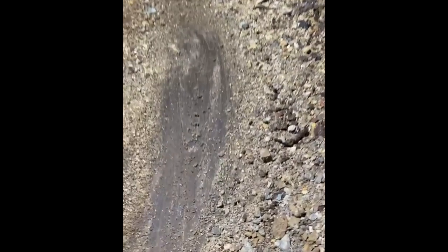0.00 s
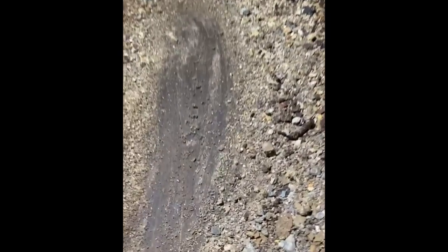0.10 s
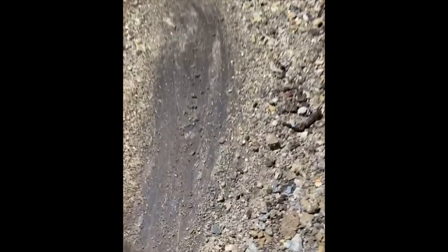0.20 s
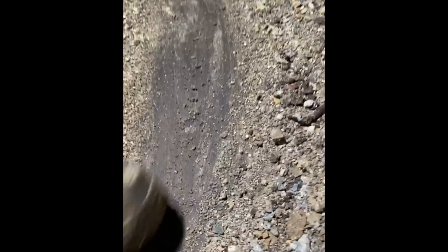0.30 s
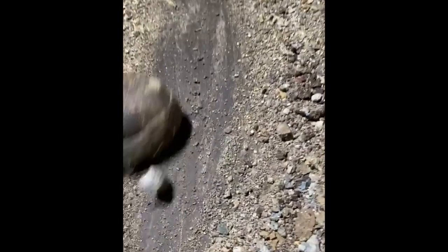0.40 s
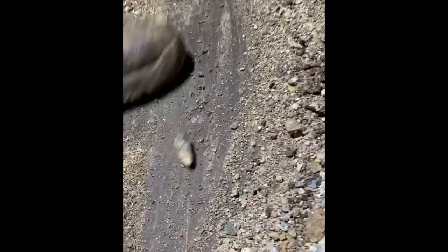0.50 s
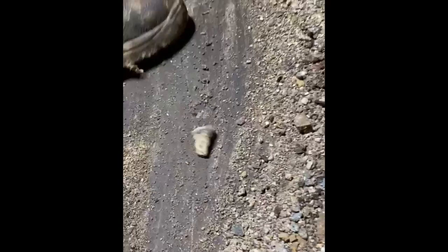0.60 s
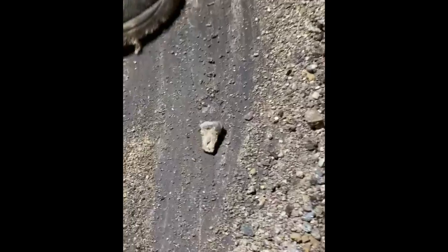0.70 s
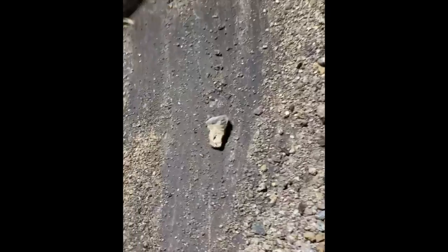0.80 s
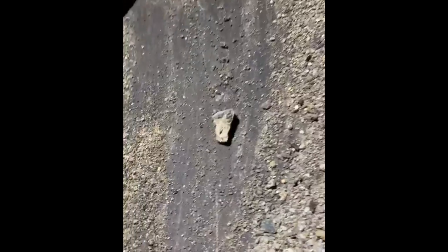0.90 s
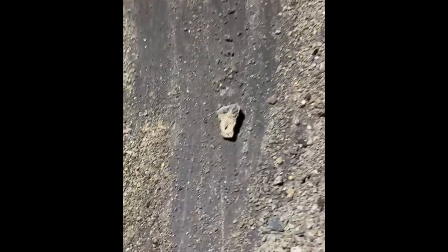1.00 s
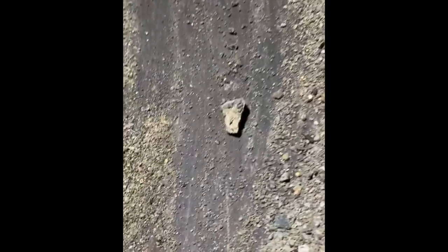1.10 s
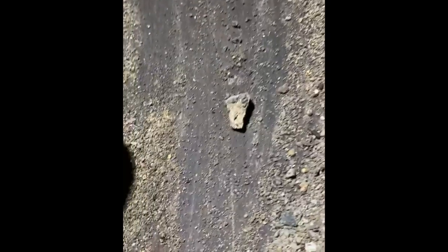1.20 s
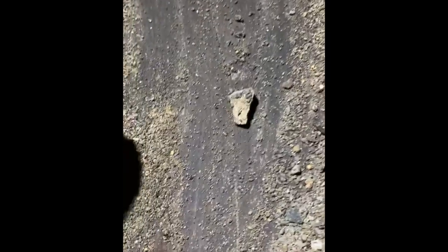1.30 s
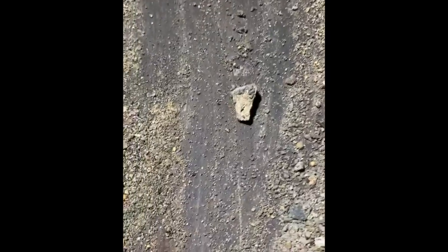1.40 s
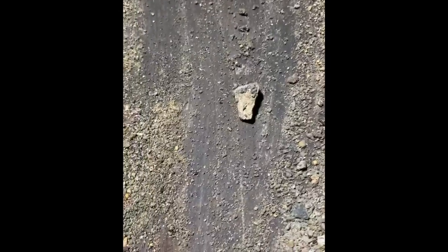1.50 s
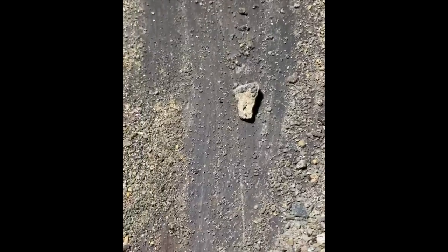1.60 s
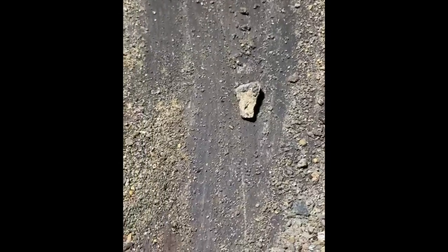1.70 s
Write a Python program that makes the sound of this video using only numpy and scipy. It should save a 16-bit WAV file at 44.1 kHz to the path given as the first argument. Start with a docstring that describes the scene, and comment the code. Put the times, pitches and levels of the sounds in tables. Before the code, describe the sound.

A work boot drags briefly over crackling grit, strikes gravel with a loud crunch and low thud, sprays sand and pebbles that settle, then grinds softly; close stereo microphone, short dry room tail.

```python
"""Boot kicking along gritty gravel

A work boot drags in over crackling grit, strikes with a crunch and a low thud, and sends sand and pebbles moving.
The grit settles; then the sole grinds softly once more, leaning further left.
Friction is filtered random grains, impacts are decaying modes, and fractures are short bursts of clicks.
Two close microphone ports hear it with a short room tail and quiet air."""
import sys
import numpy as np
from scipy import signal
from scipy.fft import rfft, irfft
from scipy.io import wavfile
from scipy.ndimage import uniform_filter1d

SR = 44100
rng = np.random.default_rng(int(sys.argv[2]) if len(sys.argv) > 2 else 0)


def persist_wave(psi):
    """Save psi, clipped to +-1, as 16-bit WAV."""
    counts = np.round(np.clip(psi, -1, 1) * 32767).astype(np.int16)
    wavfile.write(sys.argv[1], SR, np.atleast_2d(counts).T)


N = 79380
T = np.arange(N) / SR  # time in s
# In every colour table, level_db is a relative spectral density.


def amp(db):
    """Level to amplitude: 20 dB is a factor of ten."""
    return 10 ** (np.asarray(db) / 20)


def evened(x):
    """Power normalisation: scales to rms 1."""
    return x / np.sqrt(np.mean(x ** 2) + 1e-20)


def steadied(x, size):
    """Envelope flattening: divides by the running rms over size samples."""
    return x / np.sqrt(abs(uniform_filter1d(x ** 2, size)) + 1e-9)


def read(points, hz):
    """Interpolation of a curve on a logarithmic frequency axis."""
    f, value = np.transpose(points)
    return np.interp(np.log(hz + 1), np.log(f + 1), value)


def add(mix, s, sound):
    """Superposition: adds a sound into the mix from s seconds on."""
    part = mix[max(round(s * SR), 0):][:len(sound)]
    part += sound[:len(part)]


def colour(x, tone, size=4096):
    """Minimum-phase filtering: the log gain fixes the phase; the response has unit energy."""
    log_gain = np.log(amp(read(tone, abs(np.fft.fftfreq(size, 1 / SR)))))
    spectrum = np.exp(np.conj(signal.hilbert(log_gain)))
    taps = np.fft.ifft(spectrum).real[:size // 2]
    return signal.fftconvolve(x, taps / np.linalg.norm(taps))[:len(x)]


def high_pass(x, hz):
    """Second-order high-pass filtering: attenuates what lies below hz."""
    return signal.sosfilt(signal.butter(2, hz, "high", fs=SR, output="sos"), x)


def ring(hz, t60, rise, size=12000):
    """Damped oscillation: one mode falls 60 dB in t60 seconds after a soft start."""
    t = T[:size]
    decay = np.exp(-np.log(1000) * t / t60)
    return np.sin(2 * np.pi * hz * t) * decay * (1 - np.exp(-t / rise))


def burst(length, tone, rise, size=4096):
    """Brittle fracture: random clicks swell and die; their energy is that of rms 1 over length."""
    t = np.arange(size) / SR
    fractures = rng.standard_normal(size) * (rng.random(size) < .4)
    attack = np.minimum(t / (rise * length + 1e-9), 1) ** 2  # rise is a share of the length
    x = colour(fractures * np.exp(-(t / length) ** 2) * attack, tone)
    return x * np.sqrt(length * SR / (np.sum(x ** 2) + 1e-20))


def grains(per_s, spread_db):
    """Random impulse train: signs are random, levels exponentially scattered in dB."""
    sizes = amp(spread_db * np.minimum(rng.exponential(1, N), 4))
    signs = rng.choice([-1., 1.], N)
    return evened(sizes * signs * (rng.random(N) < per_s / SR))


def scrape(curve, tone, per_s, spread_db, clump_db, body_db, treble_db):
    """Granular friction: clumped grains in two bands, each following its own level curve."""
    split_hz, fade_s = 2570, 0.036
    s, body, treble = np.transpose(curve)
    clumps = amp(clump_db * evened(uniform_filter1d(rng.standard_normal(N), size=200)))
    grit = colour(grains(per_s, spread_db) * clumps, tone)

    def band(kind):
        """Band splitting: one side of the split, held at a steady level."""
        return steadied(signal.sosfilt(signal.butter(3, split_hz, kind, fs=SR, output="sos"), grit), size=2000)

    low = band("low") * amp(body_db + np.interp(T, s, body))
    high = band("high") * amp(treble_db + np.interp(T, s, treble))
    # full between the ends of the curve, fading outside them
    gate = np.clip(np.minimum(T - s[0], s[-1] - T) / fade_s + 1, 0, 1)
    return gate * (low + high)


def thuds():
    """Damped low modes: heel and stones thud dully."""
    # thuds: start_s, level_db, pitch_hz, t60_s
    thud_list = [(.18, -18.5, 233, 0.046), (0.196, -14.5, 81, 0.14), (0.228, -19, 188.4, 0.063),
                 (0.315, 4.5, 103, 0.021), (0.3299, 0, 76.3, 0.12), (.355, -16.5, 288, 0.039),
                 (0.5, -13, 189, 0.026), (0.527, -15.5, 75.5, .13), (0.663, -30.5, 144.5, 0.22),
                 (.74, -18, 140, .06), (0.751, -19, 240, 0.021), (.773, -23, 195, 0.036),
                 (0.848, -33, 265, 0.031), (1.062, -55, 328, 0.017), (1.073, -45, 220, 0.046),
                 (1.237, -51, 62.2, .15), (1.385, -50.5, 106.6, .1), (1.555, -40, 300, 0.02),
                 (1.608, -38, 200, 0.03)]
    out = np.zeros(N)
    for s, db, hz, t60 in thud_list:
        add(out, s, amp(db) * ring(hz, t60, rise=0.0024))
    return out


def boot_ring():
    """Modal superposition: the kick rings the modes of the boot together, with alternating signs."""
    # modes of the boot: pitch_hz, level_db (before kick_db), t60_s
    boot_modes = [(139.3, -18.5, .36), (203.7, -23.5, 0.47), (285.4, -22, .19), (422, -25, .12),
                  (467, -28, 0.17), (597, -33.5, 0.13), (744.4, -10.5, .09), (863, -21, 0.098),
                  (1096, -31, 0.048), (1255, -27.5, .07), (1333, -31, .08)]
    kick_s, kick_db = .31, -0.5
    out = np.zeros(N)
    for k, (hz, db, t60) in enumerate(boot_modes):
        add(out, kick_s, (-1) ** k * amp(kick_db + db) * ring(hz, t60, rise=0.0026))
    return out


def crunch():
    """Brittle fracture in three bands: gravel is crushed under the kick."""
    # crushed gravel: start_s, length_s, body_db, middle_db, treble_db
    crunches = [(0.2994, 0.0017, -22, -42.5, -44.5), (.303, 0.011, -28.5, -39, -37),
                (0.3077, 0.0064, -16.5, -30, -25.5), (0.3145, 0.0035, -17, -23, -24),
                (0.3192, 0.0046, -18.5, -23.5, -26), (0.3497, 0.0042, -23, -33, -44),
                (0.3539, .0055, -20, -24.5, -36.5), (.364, 0.0032, -36.5, -34, -42),
                (0.3685, 0.002, -26.5, -26, -36.5)]
    # colours of the three bands: frequency_hz, level_db
    body_tone = [(120, -8.5), (280, 1.5), (420, -6), (600, -6), (780, 1.5), (1000, -2), (1400, -5),
                 (1900, -15.5), (4000, -45)]
    middle_tone = [(1000, -29), (1800, -0.5), (2300, 1.5), (2800, -2.5), (3500, -0.5), (4300, -0.5),
                   (5000, -6), (6000, -10), (9000, -35)]
    treble_tone = [(3500, -27.5), (5500, -20.5), (7300, 2), (8700, -7), (9700, -2.5), (10700, -9),
                   (13500, -8.5), (15800, -10.5)]
    out = np.zeros(N)
    for s, length, *levels in crunches:
        for db, tone in zip(levels, (body_tone, middle_tone, treble_tone)):
            add(out, s, amp(db) * burst(length, tone, rise=0.4))
    return out


def drag():
    """Granular friction: the sole drags in over grit, then scrapes up to the kick."""
    # sole dragging: time_s, body_level_db, treble_level_db (before the offsets below)
    drag_levels = [(0, -37, -49.5), (.03, -48, -68), (.09, -46.5, -55.5), (.12, -43.5, -49.5),
                   (.15, -41, -57.5), (.18, -31.5, -49), (.205, -38, -69), (.26, -31.5, -65),
                   (.286, -43.5, -74), (.305, -27.5, -35)]
    # colour: frequency_hz, level_db
    drag_tone = [(150, -18), (300, 1.5), (750, 7), (1300, -3.5), (1900, -12), (2700, -10), (3500, -24),
                 (6500, -38.5), (9500, -22.5), (12500, -21), (15800, -31.5)]
    return scrape(drag_levels, drag_tone, per_s=1700, spread_db=-0.5, clump_db=3.0, body_db=-3.0, treble_db=3)


def grind():
    """Granular friction: the sole grinds softly at the end."""
    # sole grinding: time_s, body_level_db, treble_level_db (before the offsets below)
    grind_levels = [(1.28, -76.5, -75), (1.32, -64, -71), (1.38, -67.5, -78.5), (1.455, -83, -75.5),
                    (1.475, -52, -71), (1.525, -42, -55.5), (1.585, -48, -61), (1.61, -42, -58.5),
                    (1.68, -49, -62), (1.715, -58.5, -65), (1.8, -68, -64.5)]
    # colour: frequency_hz, level_db
    grind_tone = [(150, -8), (300, 2), (550, 2.5), (850, -11), (1180, 2), (1650, -13.5), (2100, -12.5),
                  (2500, -19.5), (3200, -24.5), (6500, -25.5), (7300, -27), (7750, -22.5), (8300, -30),
                  (9500, -25.5), (11000, -25), (15800, -42)]
    return scrape(grind_levels, grind_tone, per_s=1600, spread_db=2.0, clump_db=3.0, body_db=-4, treble_db=1.0)


def sand():
    """Granular friction: coarse grit scuffs under the sole, then finer sand slides and settles."""
    # scuff after the kick, and slide: time_s, body_level_db, treble_level_db (before the offsets below)
    scuff_levels = [(.33, -43, -61), (.343, -41.5, -50.5), (.355, -25, -36.5), (.385, -31.5, -47.5),
                    (.42, -32.5, -48.5), (.465, -28, -40), (.492, -28, -47)]
    slide_levels = [(.495, -34.5, -45.5), (.56, -34, -45.5), (.64, -39, -46), (.67, -34, -45),
                    (.74, -37.5, -42), (.795, -42, -48.5), (.85, -51.5, -61), (.95, -52, -64.5),
                    (1.04, -61.5, -73), (1.09, -60, -60), (1.19, -72, -76), (1.28, -73.5, -79.5)]
    # their colours: frequency_hz, level_db
    scuff_tone = [(150, -18), (300, 1), (800, -1.5), (1400, -1), (2200, -6), (3300, -1.5), (4700, -8),
                  (6500, -11), (9000, -22.5), (12000, -25.5), (15800, -41)]
    slide_tone = [(150, -12), (300, -8), (800, -5), (1400, -8), (2100, -11), (3100, -9), (4700, -4),
                  (6500, -8), (9000, -11), (12500, -14), (15800, -51)]
    scuff = scrape(scuff_levels, scuff_tone, per_s=2600, spread_db=2.0, clump_db=1.0, body_db=-3.5, treble_db=5.5)
    slide = scrape(slide_levels, slide_tone, per_s=5500, spread_db=3.0, clump_db=1.05, body_db=-5, treble_db=-2.0)
    return scuff + slide


def knocks():
    """Impact of small solids: each pebble rings briefly and chips around its own pitch."""
    # knocks: start_s, level_db, pitch_hz, chip_db (relative to level_db), chip_length_s
    knock_list = [(.057, -27, 900, -10, 0.0099), (.119, -25, 2500, -27, 0.0068),
                  (0.1322, -17, 960, -21, 0.0093), (0.154, -30, 1130, -16, 0.0056),
                  (0.17, -24.5, 1080, -16.5, 0.0063), (.173, -22, 710, -18, 0.0062),
                  (0.183, -21.5, 543, -22.5, 0.0075), (.2165, -17, 560, -25, 0.0034),
                  (0.235, -23, 1250, -33, .003), (0.2391, -33, 1032, -27, .002),
                  (0.2611, -22, 1130, -28, .004), (0.2627, -15, 701, -28, .004),
                  (0.4935, -22.5, 2400, -22, 0.0032), (0.4969, -13, 950, -13, 0.0048),
                  (0.4987, -15, 473, -10.5, .004), (0.846, -32.5, 655, -19, 0.0029),
                  (.905, -42, 2330, -15, 0.0028), (.9955, -49.5, 2260, 4.5, 0.0013),
                  (1.05, -45, 2400, -12, 0.0018), (1.062, -44, 2410, -20, .002),
                  (1.101, -46, 2500, -16, .002), (1.208, -50, 1375, -16, 0.0053),
                  (1.351, -49.5, 1508, -20, 0.0027), (1.386, -45.5, 1950, -14.5, .002),
                  (1.387, -48.5, 2750, -24, 0.0021), (1.428, -49.5, 2506, -11.5, 0.0012),
                  (1.469, -41.5, 1250, -16, 0.0084), (1.501, -39, 1240, -19, 0.004),
                  (1.528, -36.5, 1200, -14, 0.0033), (1.532, -29.5, 590, -16, 0.0015),
                  (1.554, -37, 1200, -17.5, .005), (1.583, -30, 510, -20, 0.0047),
                  (1.602, -34.5, 1110, -27, .004), (1.607, -29.5, 1180, -14, 0.0021),
                  (1.638, -23.5, 1134, -20, 0.0028), (1.66, -43, 1300, -8, 0.003),
                  (1.666, -39.5, 4240, -14.5, 0.0096), (1.69, -32, 1430, -17, 0.0016)]
    # colour of the chipping: multiple of the pitch, level_db
    chip_tone = [(.15, -7.5), (.5, -2), (1, 5), (1.8, -3.5), (3.3, -15), (8, -23.5), (16, -32)]
    out = np.zeros(N)
    for s, db, hz, chip_db, chip_s in knock_list:
        tone = [(multiple * hz, level) for multiple, level in chip_tone]
        chips = amp(chip_db) * burst(chip_s, tone, rise=0.11)
        tap = amp(-4) * ring(hz, t60=0.014, rise=0.00044, size=4096)
        add(out, s, amp(db) * (tap + chips))
    return out


def snaps():
    """Brittle fracture: single grains snap brightly."""
    # snaps: start_s, level_db (before snap_db)
    snap_list = [(0.0054, -35.5), (0.0384, -37), (0.057, -37.5), (0.1325, -41.5), (0.185, -44),
                 (0.2132, -38), (0.2314, -41), (0.234, -34.5), (0.2526, -30.5), (0.4577, -34.5),
                 (0.9953, -61), (1.3334, -56), (1.5003, -37.5), (1.514, -56), (1.534, -48), (1.549, -50),
                 (1.566, -55), (1.6047, -45), (1.6362, -61), (1.675, -51.5), (1.766, -53)]
    # colour: frequency_hz, level_db
    snap_tone = [(2000, -35.5), (4500, -18), (7500, -10.5), (9600, 0), (12500, -5), (15800, -20)]
    snap_s, snap_db = 0.002, -3.5
    out = np.zeros(N)
    for s, db in snap_list:
        add(out, s, amp(db + snap_db) * burst(snap_s, snap_tone, rise=0.8))
    return out


def rattle():
    """Random collisions: loose pebbles tap at random, each tap a damped mode of its own pitch."""
    # rattles: start_s, end_s, level_db, hits_per_s, lowest_pitch_hz, highest_pitch_hz
    rattles = [(0.097, 0.288, -48, 220, 466, 1550), (0.366, 0.501, -44.5, 430, 919, 3770),
               (0.824, 1.004, -74, 150, 790, 3050), (1.02, 1.132, -68, 200, 1500, 3220),
               (1.04, 1.121, -62, 150, 330, 547), (1.507, 1.678, -68, 260, 399, 2060)]
    t60_s, level_range_db = 0.014, 5
    out = np.zeros(N)
    for start, end, db, per_s, low_hz, high_hz in rattles:
        taps = np.zeros(N)
        count = max(int(per_s * (end - start)), 1)
        for when, pitch, weight in rng.random((count, 3)):
            hz = low_hz * (high_hz / low_hz) ** pitch
            tap = amp(level_range_db * weight) * ring(hz, t60_s, rise=0.00013, size=2000)
            add(taps, start + when * (end - start), tap)
        # rms set over the rattle's own span
        out += amp(db) * evened(taps) * np.sqrt((end - start) * SR / N)
    return out


def rumble():
    """Forced vibration: the sole judders over the stones and shakes the floor in two low bands."""
    # floor shaking: time_s, bass_level_db, low_middle_level_db (before murk_db)
    shaking = [(0, -29, -33.5), (.08, -38, -47), (.15, -29.5, -40.5), (.19, -26, -42.5), (.215, -36, -34),
               (.24, -34, -33.5), (.27, -30, -36), (.3, -24, -33), (.345, -22, -30), (.375, -28, -30),
               (.39, -22, -33.5), (.45, -34, -44), (.485, -38, -55), (0.501, -36, -27.5),
               (.515, -25.5, -58), (.54, -36, -36.5), (0.578, -40.5, -51), (0.721, -42.5, -41.5),
               (.75, -48, -32), (.79, -42, -35), (.825, -46, -47.5), (1.022, -59, -68.5), (1.072, -69, -59),
               (1.202, -72, -81), (1.465, -66.5, -69), (1.524, -52.5, -49), (1.679, -46.5, -46.5),
               (1.73, -53.5, -64), (1.8, -57, -72)]
    # colours of bass and low middle: frequency_hz, level_db
    bass_tone = [(15, -36), (35, -23), (55, -4), (75, -0.5), (100, -7), (140, -20.5), (300, -58.5)]
    murk_tone = [(60, -16), (105, 3), (140, -2.5), (200, -3.5), (290, -4), (400, -15.5), (800, -45.5)]
    murk_db = 0.5
    s, bass, murk = np.transpose(shaking)
    deep = steadied(colour(rng.standard_normal(N), bass_tone), size=1500)
    dull = steadied(colour(grains(900, 2.6), murk_tone), size=1300)
    return deep * amp(np.interp(T, s, bass)) + dull * amp(murk_db + np.interp(T, s, murk))


def quiet_air():
    """Stationary noise: Gaussian noise through a fixed colour."""
    # colour: frequency_hz, level_db
    air_tone = [(20, 2.5), (70, 1.5), (200, -10), (600, -22.5), (2000, -12), (5000, -19.5), (10000, -41.5),
                (15800, -44)]
    return amp(-72) * colour(rng.standard_normal(N), air_tone)


def room(x):
    """Diffuse reverberation: exponentially decaying noise, independent at each port."""
    # colour of the tail: frequency_hz, level_db
    room_tone = [(40, -30.5), (200, -12.5), (600, 1.5), (4000, 0.5), (15000, -4)]
    t60_s = 0.063
    decay = np.exp(-np.log(1000) * T[:SR // 2] / t60_s)
    tails = [colour(rng.standard_normal(SR // 2), room_tone) * decay for _ in range(2)]
    return np.array([signal.fftconvolve(x, tail / np.linalg.norm(tail))[:N] for tail in tails])


def ports(x, balance, size=2 * N):
    """Interchannel phase and level: opposite halves go to each port, keeping the mean power."""
    # phase between the ports: frequency_hz, phase_rad
    port_phase = [(300, 0), (700, -.2), (1120, -.7), (2400, .8), (3400, .9), (4400, 1.6), (4800, 3),
                  (5300, 6.6), (6200, 6.9), (8600, 8.1), (10500, 8.7), (15300, 9.5)]
    hz = np.fft.rfftfreq(size, 1 / SR)
    lean = amp(read(balance, hz) / 2)
    turn = np.exp(.5j * read(port_phase, hz))
    pair = np.array([lean * turn, 1 / (lean * turn)]) / np.sqrt((lean ** 2 + lean ** -2) / 2)
    return irfft(rfft(x, size) * pair, size)[:, :N]


def scene():
    """Superposition and stereo placement: opposite polarity widens the sand; the boot moves left."""
    # left port over right, at first and after the move: frequency_hz, level_db
    first_balance = [(110, 0), (200, .7), (380, 2.5), (720, 6), (1250, 2.8), (2100, 0), (3330, -2.3),
                     (5500, -.5), (15000, 0)]
    left_balance = [(100, .5), (270, 4), (450, 6), (1220, 6), (2010, 1.5), (3330, -1.5), (5500, -.5),
                    (15000, 0)]
    # the boot moves to the left: start_s, end_s
    move_left = (1.15, 1.45)
    kick = thuds() + boot_ring() + crunch()
    floor = kick + drag() + grind() + sand() + knocks() + snaps() + rattle() + rumble()
    left = np.interp(T, move_left, [0, 1])
    placed = ports(floor * (1 - left) + quiet_air(), first_balance) + ports(floor * left, left_balance)
    # a second, independent layer of sand with opposite signs at the ports
    wide = amp(-8.5) * ports(high_pass(sand(), 500), first_balance) * [[1], [-1]]
    return placed + wide + amp(-11) * room(floor)


def record(dry):
    """Saturation and band limiting: low cut, soft overload above a knee, then a steep treble limit."""
    low_cut_hz, edge_hz = 22, 15800
    knee, ceiling = .55, .82  # amplitudes
    cut = high_pass(dry, low_cut_hz)
    clean = np.clip(cut, -knee, knee)
    soft = clean + (ceiling - knee) * np.tanh((cut - clean) / (ceiling - knee))
    taps = signal.firwin(511, edge_hz, window=("kaiser", 9), fs=SR)
    return signal.oaconvolve(soft, taps[None], "same")


dry = scene()
out = record(dry)
persist_wave(out)
```